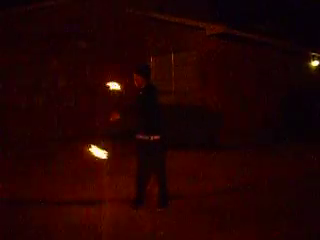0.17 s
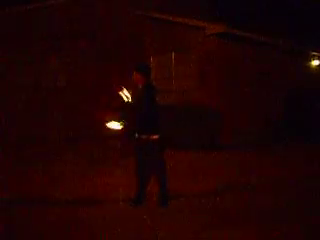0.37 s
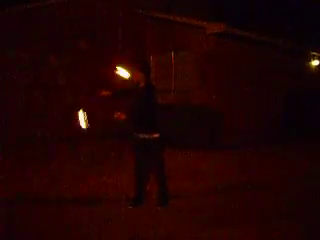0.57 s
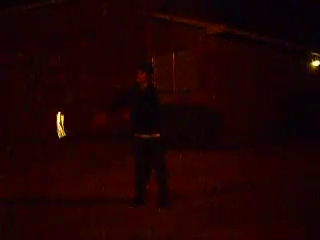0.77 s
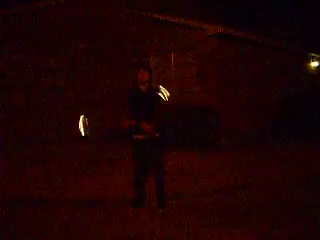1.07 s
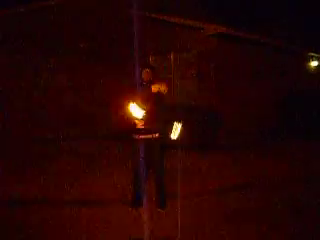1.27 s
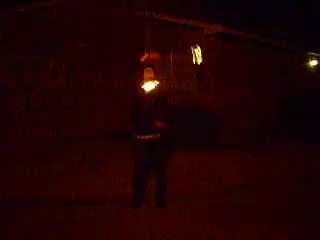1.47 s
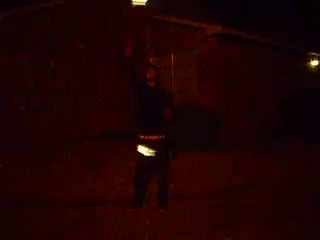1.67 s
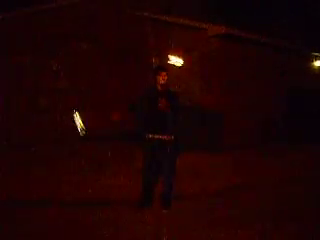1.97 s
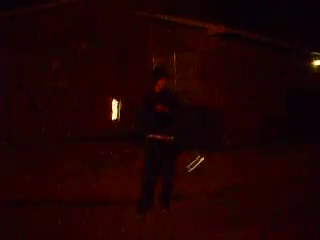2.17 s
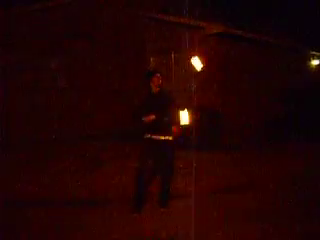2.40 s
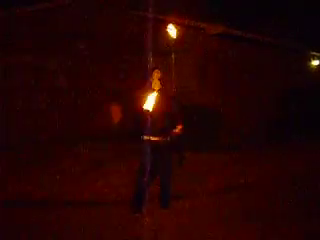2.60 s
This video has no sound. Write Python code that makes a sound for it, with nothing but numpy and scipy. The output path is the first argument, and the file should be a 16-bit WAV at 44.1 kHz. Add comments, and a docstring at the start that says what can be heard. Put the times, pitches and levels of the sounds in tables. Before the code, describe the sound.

Burning poi swing through the air in soft, irregular whooshes, each a low fluttering roar with a hollow rush. Midway, shoes scuff, squeak and crack grit. Light wind, deep hum and hiss fill the yard, heard from several metres away.

```python
"""Two burning poi swung on chains in a yard at night, some metres from a small camera's microphone.
Each swing drags a fluttering flame through the air: a boom, a low roar and a hollow, rising rush;
now and then a flame flaps. As the performer turns, soles scuff and squeak and grit cracks underfoot.
Ground and walls add a short tail. Behind it all lie light wind, a deep hum and steady hiss."""
import sys
import numpy as np
from scipy import signal
from scipy.fft import rfft, irfft
from scipy.io import wavfile
from scipy.ndimage import map_coordinates

SR = 44100
rng = np.random.default_rng(int(sys.argv[2]) if len(sys.argv) > 2 else 0)


def output_pcm(signal):
    """Save a mono or channel-first signal as 16-bit PCM at the path in sys.argv[1].

    Samples are clipped to [-1, 1] before scaling.
    """
    pcm = np.clip(np.atleast_2d(signal).T, -1, 1) * 32767
    wavfile.write(sys.argv[1], SR, np.round(pcm).astype(np.int16))


N = 120834

# Night background, spectra of the wind and the hiss: f/Hz, level/dB
WIND_SPECTRUM = [(18, -6.5), (29, 4), (48, -6.5), (70, 1), (120, -1), (250, -9), (450, -8), (640, -6.5),
                 (1000, -14.5), (1450, -20.5), (2200, -25), (3100, -29.5), (7000, -43.5)]
HISS_SPECTRUM = [(900, 7.5), (1500, -5.5), (2400, 4), (3100, -2), (4200, -1), (5500, 0), (6700, -3),
                 (7800, -5.5)]
# Shoes on the ground: loudest t/s, rise/s, fall/s, scrape level/dB, grit level/dB
SHOE_SCUFFS = [(.72, 0.079, 0.078, -66, -83), (.975, 0.089, 0.017, -58.5, -74),
               (1.5, 0.02, 0.037, -63, -64.5), (1.559, 0.003, 0.005, -54.5, -61),
               (1.598, 0.0072, 0.028, -53.5, -62), (1.73, 0.11, 0.1, -62.5, -77),
               (1.868, 0.057, 0.07, -54.5, -65.5), (1.968, .015, 0.014, -52.5, -61.5),
               (2.05, 0.03, 0.11, -59, -69), (2.24, 0.028, 0.073, -64, -69),
               (2.405, 0.0089, 0.0047, -62, -65), (2.463, 0.0075, 0.01, -75, -65)]
# A sole catching: t/s, f/Hz, level/dB
SOLE_SQUEAKS = [(1.481, 3610, -64.5), (1.558, 1969, -56.5), (1.604, 1877, -54.5), (1.752, 2703, -60.5),
                (1.826, 1733, -55), (1.86, 2236, -50.5), (1.895, 1814, -51.5), (1.965, 3810, -58.5),
                (1.972, 1675, -51.5), (2.024, 2191, -56.5), (2.11, 2890, -63.5)]
# Grit cracking underfoot: t/s, snap level/dB, crumbling level relative to the snap/dB
GRIT_TICKS = [(1.4644, -49.5, -19), (1.4758, -46.5, -10), (1.482, -42.5, -23), (1.4847, -47.5, -23),
              (1.4911, -44, -23), (1.5436, -47.5, -27.5), (1.5545, -37.5, -18), (1.5646, -45, -25),
              (1.5826, -39.5, -24.5), (2.609, -54.5, -12)]
# Footwork, spectra of scrape, grit and tick: f/Hz, level/dB
SCRAPE_SPECTRUM = [(500, 1), (900, 7), (1350, -3), (1800, 0), (2250, -2.5), (2900, -9.5), (4000, -24),
                   (7000, -27)]
GRIT_SPECTRUM = [(1200, -22), (2500, -5), (3200, -5), (3600, 4), (4500, 1), (5600, -4), (6600, -2.5),
                 (7800, -6.5)]
TICK_SPECTRUM = [(900, -23), (2000, 4.5), (3400, 6), (4600, 8.5), (5700, -8), (6700, -1.5), (8000, -6.5)]
# A flame tearing in the airstream: t/s, puff level/dB, thump level/dB
FLAME_FLAPS = [(0.295, -48, -55.5), (0.629, -47.5, -45.5), (1.159, -41.5, -51), (1.195, -43.5, -56),
               (1.843, -53, -37.5), (2.709, -50, -39.5)]
# Poi swings: top speed t/s, rise/s, fall/s, boom level/dB, roar level/dB, rush level/dB, rush f/Hz
POI_SWINGS = [(.06, 0.19, .22, -51, -54, -54, 688), (.37, .084, .19, -49.5, -51.5, -60, 620.6),
              (.665, .058, .11, -50.5, -49.5, -48.5, 649.8), (.75, .06, .035, -51.5, -52, -56, 702),
              (0.919, .08, .06, -51, -56, -54, 729.6), (1.035, .05, 0.069, -49, -48, -50, 713),
              (1.188, .045, .075, -48.5, -56.5, -50.5, 592.2), (1.4, .08, .08, -53, -52, -55, 702.3),
              (1.56, .07, .068, -51, -47.5, -54.5, 620), (1.715, .045, .09, -45.5, -50, -47.5, 619.7),
              (1.846, 0.01986, .03, -48.5, -45.5, -56, 805.4), (1.984, .05, .09, -51, -48.5, -51, 730.5),
              (2.189, .05, .08, -48.5, -52, -52.5, 689.5), (2.31, 0.0524, .16, -48.5, -53.5, -58.5, 659),
              (2.71, .034, .06, -45.5, -48, -52.5, 650)]
# Flames, spectra of puff, boom, roar and rush: f/Hz, level/dB
PUFF_SPECTRUM = [(150, -3.5), (400, 0.5), (700, 2), (1000, -10.5), (1500, -22.5), (3000, -27)]
BOOM_SPECTRUM = [(22, -3.5), (35, -10.5), (50, 2.5), (80, 3.5), (125, -0.5), (175, -6), (260, -23.5),
                 (600, -39)]
ROAR_SPECTRUM = [(90, -13), (170, -6.5), (250, -2.5), (350, -4), (470, -14), (900, -28), (2500, -45)]
RUSH_SPECTRUM = [(150, -17.5), (300, -15), (470, -10.5), (600, 2), (740, -1), (930, -11), (1400, -23),
                 (2400, -27), (3200, -28), (7000, -42.5)]
RUSH_HZ = 665.8  # pitch at which RUSH_SPECTRUM is given
# The camera's treble response: f/Hz, level/dB
CAMERA_TREBLE = [(6700, 0), (7100, -5), (7450, -13), (7700, -24), (7950, -42), (8300, -70)]


def undb(db):
    """Decibels to gain."""
    return 10 ** (np.asarray(db) / 20)


def unit(x):
    """Scale to rms 1."""
    return x / np.sqrt(np.mean(x ** 2))


def colour(x, points):
    """Causal filter through points (f/Hz, level/dB), falling 20 dB an octave beyond both ends."""
    hz, db = np.array(points, float).T
    octave = np.log2(np.maximum(np.fft.rfftfreq(2 * N, 1 / SR), 1))
    beyond = np.maximum(np.log2(hz[0]) - octave, 0) + np.maximum(octave - np.log2(hz[-1]), 0)
    gain = undb(np.interp(octave, np.log2(hz), db) - 20 * beyond)
    cepstrum = irfft(np.log(gain))
    cepstrum[1:N] *= 2  # fold to minimum phase
    cepstrum[N + 1:] = 0
    return irfft(rfft(x, 2 * N) * np.exp(rfft(cepstrum)))[:N]


def noise(points):
    """Coloured noise, rms 1."""
    return unit(colour(rng.standard_normal(N), points))


def waver(rate_hz):
    """Smooth random curve that changes about rate_hz times a second, rms 1."""
    f = np.fft.rfftfreq(N, 1 / SR)
    lowpass = np.exp(-(f / rate_hz) ** 2) * (f > 0)
    return unit(irfft(rfft(rng.standard_normal(N)) * lowpass, N))


def swell(at, rise_s, fall_s):
    """A bell-shaped power envelope with its own rise and fall."""
    t = np.arange(N) / SR - at
    return 1 / np.cosh(np.clip(t / np.where(t < 0, rise_s, fall_s), -20, 20)) ** 2


def swell_gains(rows):
    """One gain curve per level column, summed in power; rows are t/s, rise/s, fall/s, levels/dB."""
    rows = np.array(rows)
    shapes = np.array([swell(*row[:3]) for row in rows])
    return np.sqrt(undb(rows[:, 3:]).T ** 2 @ shapes)


def night(wind_db=-50.5, hum_hz=29.3, hum_db=-54, hiss_db=-69):
    """The bed behind the performer: light wind with distant rumble, a deep wavering hum, even hiss."""
    wind = noise(WIND_SPECTRUM) * undb(wind_db - 0.05 * waver(2.3))
    phase = 2 * np.pi * np.cumsum(hum_hz * (1 + 0.07 * waver(1.8))) / SR
    hum = np.sqrt(2) * np.sin(phase) * undb(hum_db + 2.5 * waver(7.6))
    return wind + hum + undb(hiss_db) * noise(HISS_SPECTRUM)


def yard(direct, decay_s=0.075, tail_db=-13):
    """Ground and walls send a short diffuse tail to the microphone after the direct sound."""
    t = np.arange(SR // 2) / SR
    tail = rng.standard_normal(len(t)) * np.exp(-t / decay_s)
    return direct + undb(tail_db) * signal.fftconvolve(direct, tail / np.linalg.norm(tail))[:N]


def grains(spread_db, per_s=3500):
    """Grains under a sole: dense clicks, mostly small with a few large ones."""
    size = undb(spread_db * np.minimum(rng.exponential(size=N), 5))
    return (rng.random(N) < per_s / SR) * size * rng.choice([-1, 1], N)


def scuffs():
    """Soles drag over the ground: a grainy scrape and bright grit."""
    scrape = unit(colour(grains(spread_db=4), SCRAPE_SPECTRUM))
    grit = unit(colour(grains(spread_db=5.5), GRIT_SPECTRUM))
    scrape_gain, grit_gain = swell_gains(SHOE_SCUFFS)
    return scrape * scrape_gain + grit * grit_gain


def squeaks(half_length_s=0.003, pitch_spread=0.0728):
    """A catching sole rings briefly at a rough, unsteady pitch."""
    out = np.zeros(N)
    for at, hz, db in SOLE_SQUEAKS:
        phase = 2 * np.pi * np.cumsum(hz * (1 + pitch_spread * waver(458))) / SR
        envelope = np.sqrt(swell(at, half_length_s, half_length_s))
        out += np.sqrt(2) * np.sin(phase) * undb(db) * envelope
    return out


def ticks(ring_hz=3600, ring_s=0.003, ring_db=-13.5, crumble_s=0.0028):
    """Single stones crack underfoot: a sharp snap, a brief ring and a few milliseconds of crumbling."""
    t = np.arange(N) / SR
    hits, crumbling = np.zeros(N), np.zeros(N)
    for at, db, crumble_db in GRIT_TICKS:
        hits[int(at * SR)] += undb(db)
        crumbling += undb(db + crumble_db) * (t >= at) * np.exp(-np.abs(t - at) / crumble_s)
    snap = colour(signal.unit_impulse(N), TICK_SPECTRUM)
    ring = undb(ring_db) * np.sin(2 * np.pi * ring_hz * t) * np.exp(-t / ring_s)
    crack = snap / np.abs(snap).max() + ring
    return signal.fftconvolve(hits, crack)[:N] + crumbling * noise(TICK_SPECTRUM)


def flaps(rise_s=0.00099, fall_s=0.004):
    """Now and then a flame tears in the airstream: a short, dull puff over a low thump."""
    shapes = np.sqrt([swell(at, rise_s, fall_s) for at, _, _ in FLAME_FLAPS])
    puff_gain, thump_gain = undb(np.array(FLAME_FLAPS)[:, 1:]).T @ shapes
    return noise(PUFF_SPECTRUM) * puff_gain + noise(ROAR_SPECTRUM) * thump_gain


def rush_pitch(octaves_per_s=0.9):
    """Each swing has its own hollow pitch, rising as it passes; the loudest rush leads."""
    t = np.arange(N) / SR
    powers, pitches = [], []
    for at, rise_s, fall_s, _, _, rush_db, hz in POI_SWINGS:
        powers.append(swell(at, rise_s, fall_s) * undb(rush_db) ** 2)
        pitches.append(hz * 2 ** (octaves_per_s * (t - at)))
    return np.average(pitches, axis=0, weights=powers)


def flames(flutter_hz=32, roar_flutter_db=1.3, rush_flutter_db=1.14):
    """Flames dragged through the air, some metres off: a boom, and roar and rush fluttering together."""
    flutter = waver(flutter_hz)
    roar = unit(noise(ROAR_SPECTRUM) * undb(roar_flutter_db * flutter))
    read_position = np.cumsum(rush_pitch() / RUSH_HZ)  # noise read faster sounds higher
    gliding = map_coordinates(noise(RUSH_SPECTRUM), [read_position], mode="mirror")
    rush = unit(gliding * undb(rush_flutter_db * flutter))
    boom_gain, roar_gain, rush_gain = swell_gains([row[:-1] for row in POI_SWINGS])
    return noise(BOOM_SPECTRUM) * boom_gain + roar * roar_gain + rush * rush_gain


def scene():
    """At the microphone, in mono: flames and footwork in the yard, over the night background."""
    performer = flames() + flaps() + scuffs() + squeaks() + ticks()
    return (yard(performer) + night())[None]


def record(dry):
    """The small camera cuts off the treble steeply above about 7 kHz."""
    hz, db = np.array(CAMERA_TREBLE).T
    response = undb(np.interp(np.fft.rfftfreq(2 * N, 1 / SR), hz, db))
    return irfft(rfft(dry, 2 * N) * response)[:, :N]


dry = scene()
out = record(dry)
output_pcm(out)
```